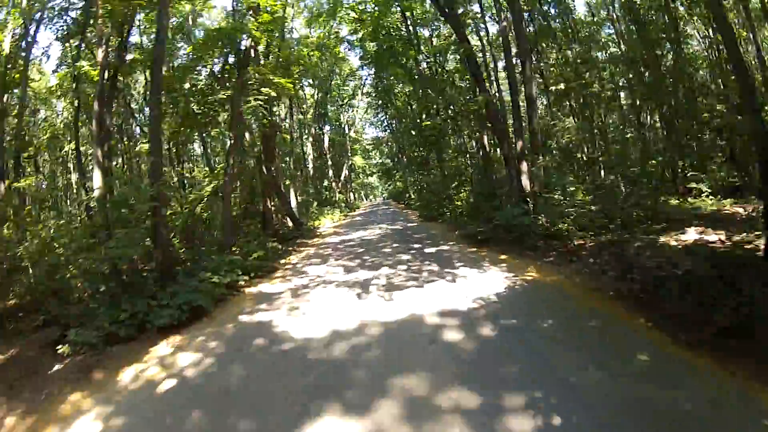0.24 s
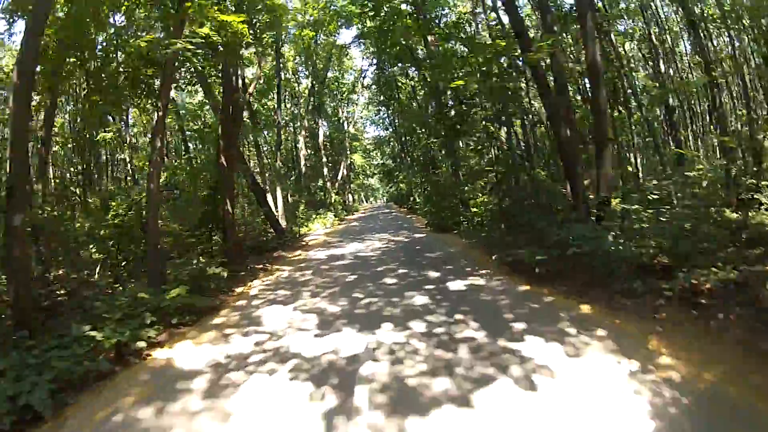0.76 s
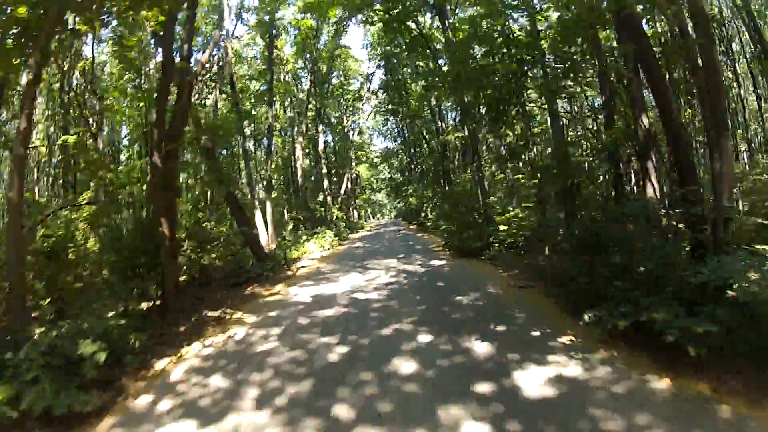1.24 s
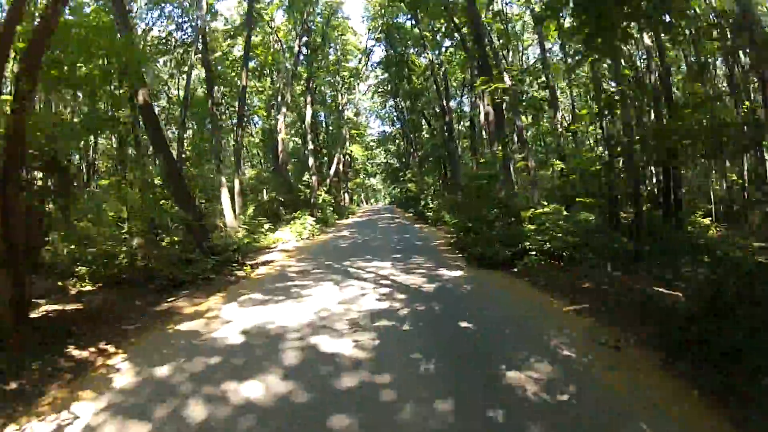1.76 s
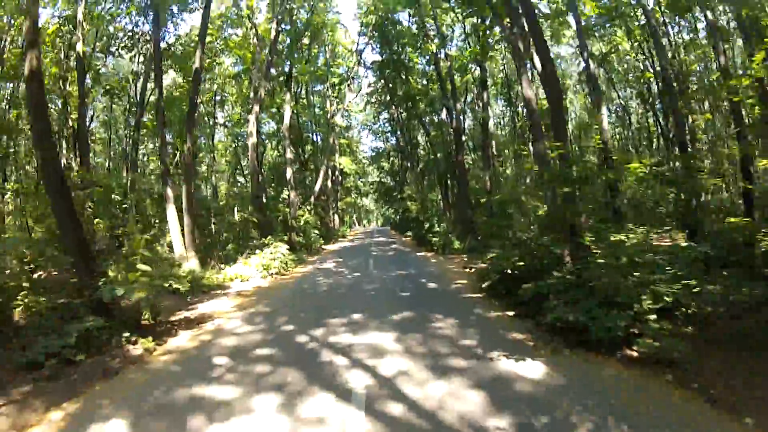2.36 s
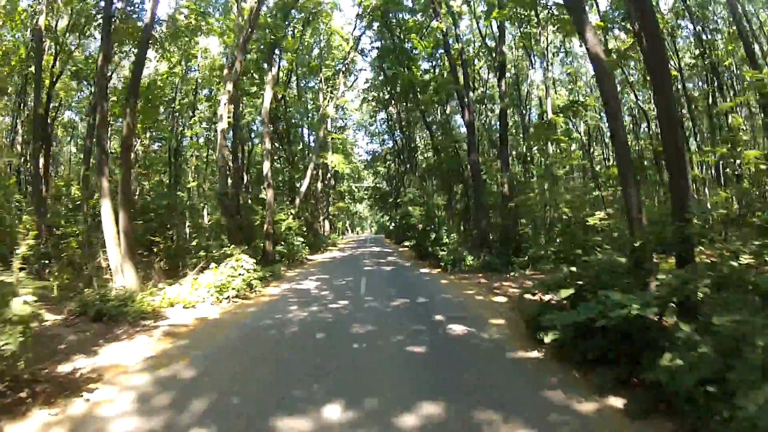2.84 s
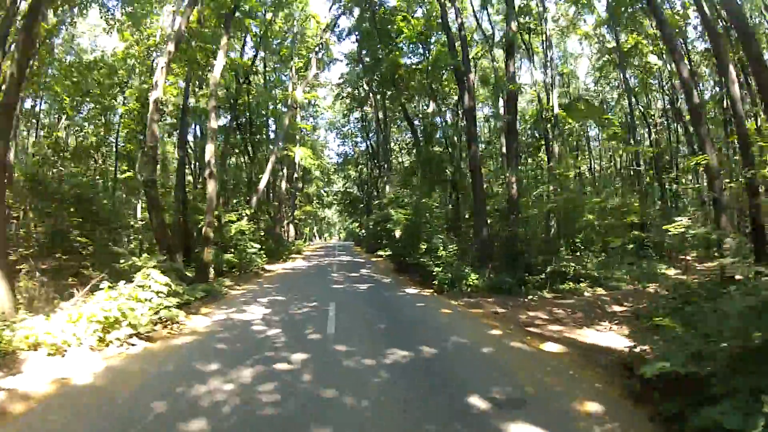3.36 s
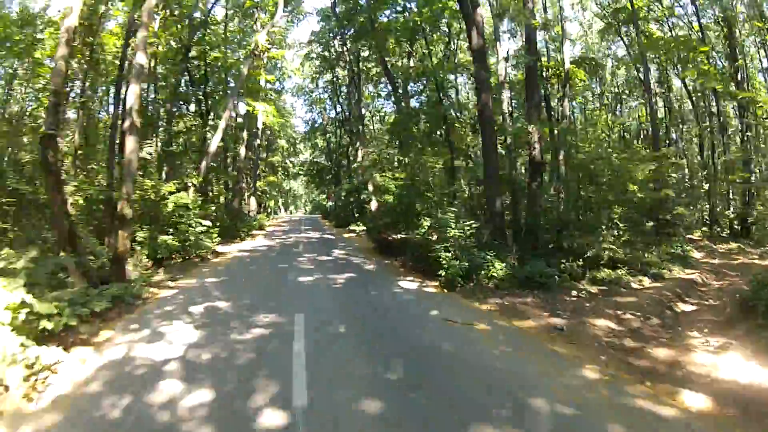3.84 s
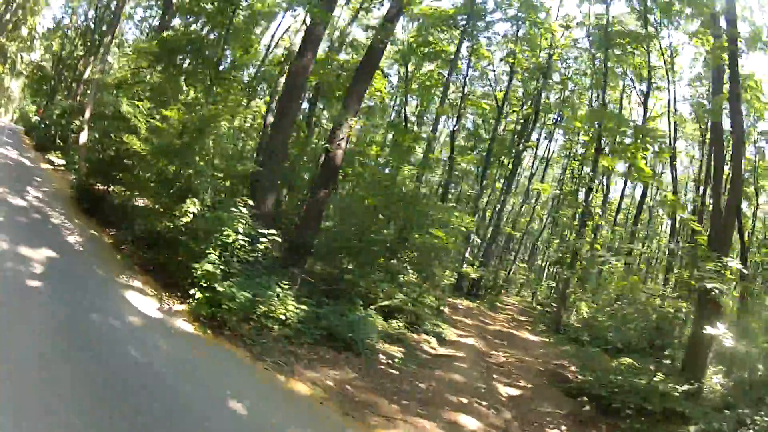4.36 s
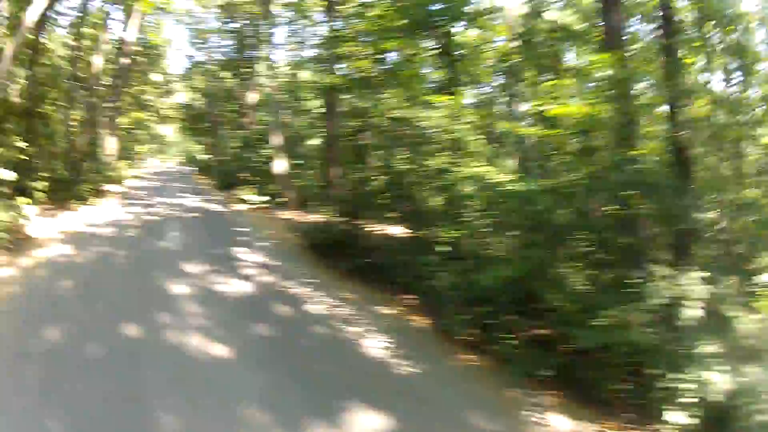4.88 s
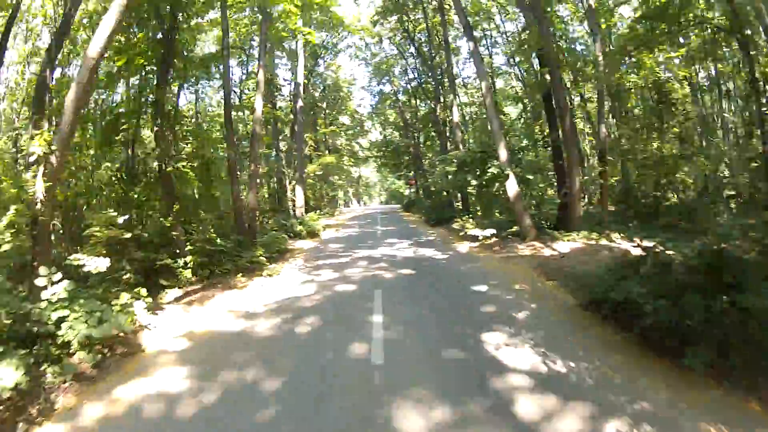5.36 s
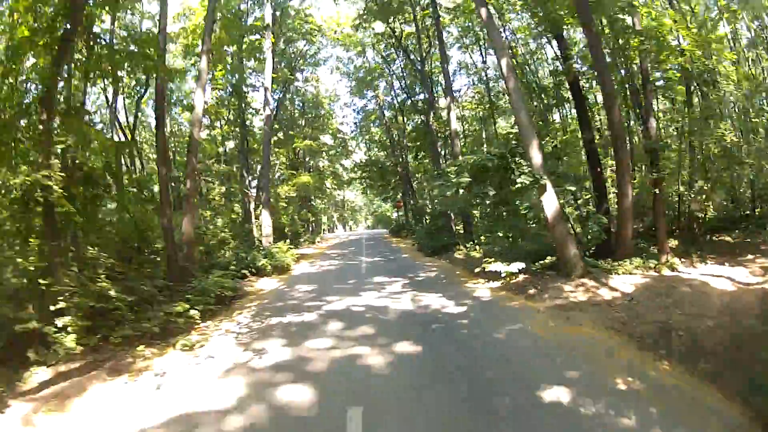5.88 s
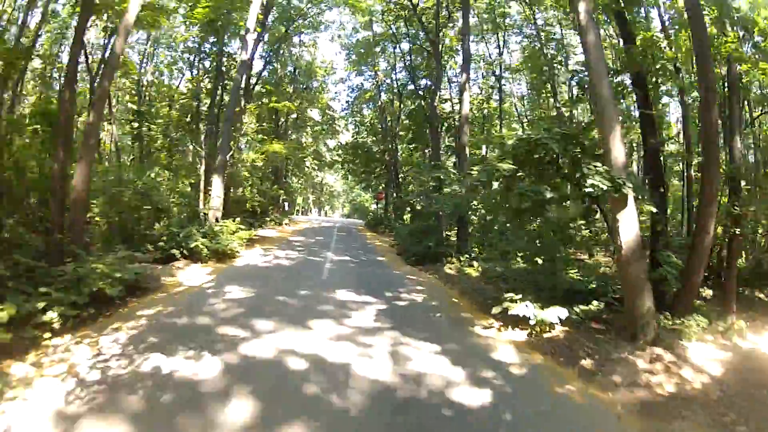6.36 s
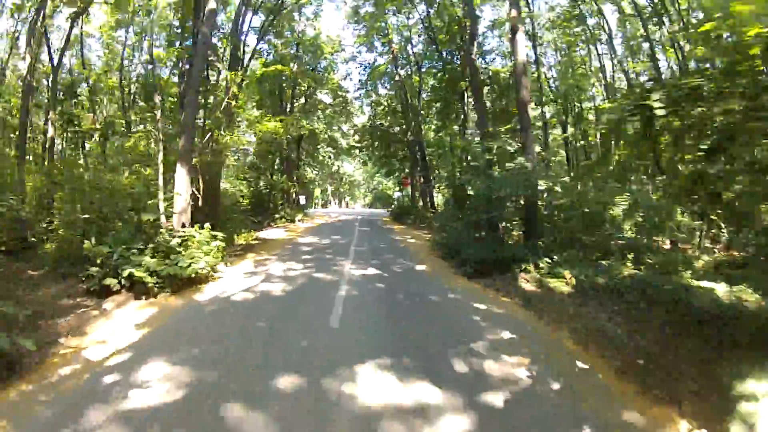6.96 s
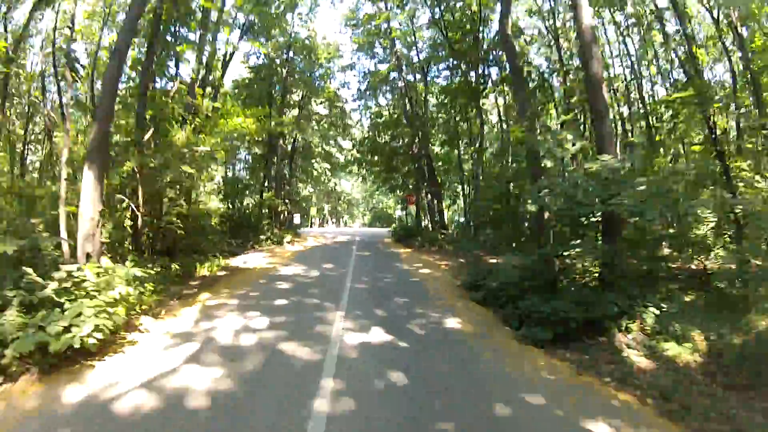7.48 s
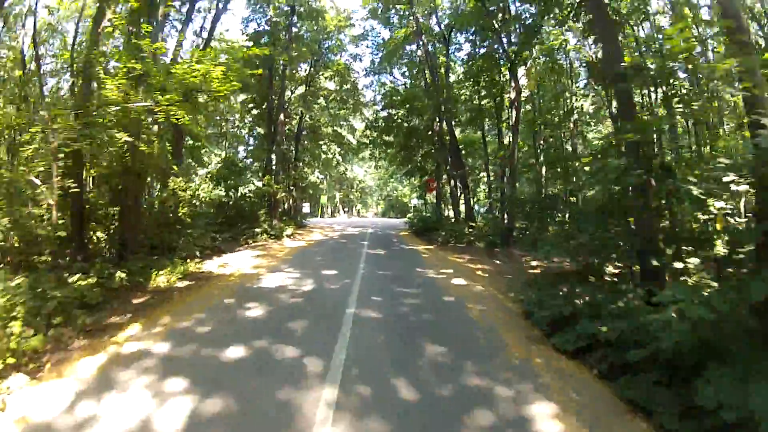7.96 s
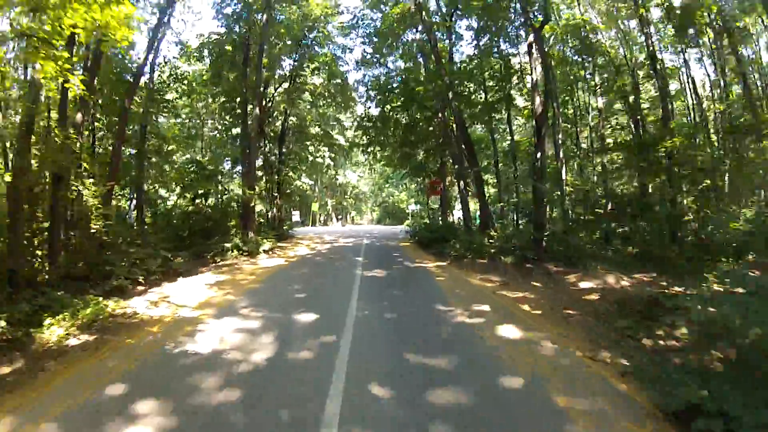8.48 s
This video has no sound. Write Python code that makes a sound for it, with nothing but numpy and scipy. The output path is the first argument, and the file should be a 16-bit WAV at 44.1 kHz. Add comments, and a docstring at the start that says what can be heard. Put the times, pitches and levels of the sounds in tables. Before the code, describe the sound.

A gusty headwind rushes and rumbles on a helmet microphone as a bicycle rolls along a paved forest road, its tyres humming softly below. Faint birds chirp in the trees. About four seconds in, the rush drops away for a second, then returns. A few sharp, dry ticks follow, and the birds chirp again near the end.

```python
"""Headwind on a small helmet camera's microphone, riding a bicycle along a paved forest road.
Right at the capsule the wind buffets the membrane and rushes in the resonances of port and housing,
fading while the head is turned. Tyres hum on the road below, birds chirp off in the trees, and a few
dry ticks sound. The recorder holds each 12 kHz sample, so the sound is mirrored in the treble."""
import sys
import numpy as np
from scipy import signal
from scipy.fft import rfft, irfft
from scipy.io import wavfile

SR = 44100
rng = np.random.default_rng(int(sys.argv[2]) if len(sys.argv) > 2 else 0)


def transcribe(u):
    """Save the signal u as a 16-bit wav file named by the first command-line argument.

    u: samples, shape (n,) or (channels, n), limited to [-1, 1]; the rate is SR.
    q: integer samples, one column per channel.
    """
    v = np.clip(np.atleast_2d(u).T, -1, 1)
    q = np.round(v * 32767).astype(np.int16)
    wavfile.write(sys.argv[1], SR, q)


N = 384552

# Single bird notes. Each row: start and length in seconds, first and last pitch in Hz, level in dB.
BIRD_CHIRPS = [(1.248, .025, 4250, 4030, -61), (2.256, 0.069, 2800, 3350, -51),
               (2.314, 0.036, 3580, 4000, -50.5), (2.355, 0.04, 3690, 3830, -59),
               (2.447, 0.02, 3810, 4020, -48.5), (2.77, 0.04, 4100, 4280, -62),
               (2.885, 0.056, 3520, 3420, -57.5), (3.09, 0.042, 4700, 4250, -70),
               (3.125, .03, 4150, 4150, -66), (3.245, 0.055, 3270, 3220, -64),
               (3.345, .025, 4150, 3980, -67), (3.65, 0.062, 4520, 4360, -71),
               (7.67, .025, 4300, 4300, -66), (7.685, 0.034, 1860, 2110, -49),
               (7.72, 0.064, 2120, 2150, -43), (7.796, 0.055, 4290, 4240, -66),
               (7.965, 0.028, 3850, 4120, -64), (7.99, .035, 3800, 3600, -58),
               (7.996, 0.021, 4140, 4230, -60), (8.05, .035, 3800, 3550, -65),
               (8.292, 0.051, 3600, 3680, -59.5), (8.35, .045, 3600, 2930, -63),
               (8.548, 0.037, 3950, 3000, -60)]
# Buzzy bird trills. Each row: start and length in seconds, centre pitch in Hz, level in dB.
BIRD_TRILLS = [(3.377, 0.1, 3900, -65), (5.53, 0.16, 3960, -63.5), (7.245, 0.24, 3950, -60.5)]
# One bird repeats a falling whistle. Each row: start in seconds, level in dB.
FALLING_CALLS = [(.242, -65), (.374, -65), (.515, -67), (.645, -62), (.77, -66)]
# Its note. Each row: delay and length in seconds, first and last pitch in Hz, relative level in dB.
FALLING_NOTES = [(0.0011, 0.023, 5950, 5050, 2)]
# Another repeats a phrase of up, down and a low end. Each row: start in seconds, level in dB.
UP_DOWN_CALLS = [(.89, -56), (1.077, -54), (1.266, -55), (1.453, -54.5), (1.642, -52.5)]
# Its notes. Each row: delay and length in seconds, first and last pitch in Hz, relative level in dB.
UP_DOWN_NOTES = [(0, 0.0206, 3600, 4090, -0.5), (0.031, 0.043, 4400, 3090, -1.5),
                 (0.072, .022, 3240, 2950, 4)]
# Dry ticks. Each row: start in seconds, level in dB, pitch in Hz, seconds to fall by 60 dB.
DRY_TICKS = [(4.866, -44, 4800, 0.014), (4.867, -48, 5600, 0.011), (5.021, -32, 2440, 0.01),
             (5.979, -29, 2480, 0.016), (6.681, -31, 2390, 0.013), (7.449, -52, 3400, .006)]
# Slow layers of the ride. Each row: time in seconds, then tyre hum, housing airflow and thin hiss in dB.
RIDE_LEVELS = [(0.0, -54.5, -47, -61), (1.0, -53, -47, -58), (3.6, -53.5, -48, -64.5),
               (4.1, -56.5, -51, -66.5), (4.4, -56, -55.5, -70.5), (4.9, -56.5, -52.5, -70),
               (5.4, -54.5, -49.5, -63), (6.7, -54, -50, -67.5), (7.3, -53.5, -49, -65.5),
               (8.0, -55, -50.5, -64), (8.72, -54.5, -50, -65.5)]
# Resonances of the tyre hum. Each row: centre and width in Hz, relative level in dB.
TYRE_RESONANCES = [(115, 97, -2.5), (187.2, 55.6, 1), (221, 62, -1), (311, 168, -6), (437, 196, -11),
                   (593, 254, -12.5)]
# Brief hisses and whistles. Each row: start and length in seconds, centre and width in Hz, level in dB.
BRIEF_WHISTLES = [(.55, 0.58, 5030, 300, -69), (2.41, 0.083, 4940, 1190, -65),
                  (7.13, 0.28, 1400, 60.2, -56), (7.997, 0.28, 1393, 60, -55)]
# Resonances of the wind's thin hiss. Each row: centre and width in Hz, relative level in dB.
HISS_RESONANCES = [(3370, 480, 0.5), (3746, 290, 2), (3940, 540, 0), (4580, 290, -6), (4970, 520, -2.5),
                   (5400, 790, -12.5), (5720, 290, -8)]
# The housing with the wind head-on. Each row: resonance and width in Hz, relative level in dB.
HEAD_ON_RESONANCES = [(749, 140, -6.5), (890, 188, -6), (999, 102, -7.5), (1188, 112, -4),
                      (1268, 126, -1.5), (1374, 120, 0), (1578, 296, -5.5), (1864, 240, -6.5),
                      (2380, 290, -25)]
# The housing with the wind side-on. Each row: resonance and width in Hz, relative level in dB.
SIDE_ON_RESONANCES = [(792, 110, -6.5), (925, 133, -5), (1140, 170, -3), (1308, 270, -5), (1750, 166, -1),
                      (1966, 240, -6), (2230, 300, -5), (2480, 670, -16)]
# The head turns aside and back. Each row: time in seconds, share of the turn from 0 to 1.
TURN_SHARES = [(3.85, 0.2), (4.25, 0.93), (4.9, 0.9), (5.15, 0.0)]
# Spectrum of the wind pressure on the membrane. Each row: frequency in Hz, relative density in dB.
BUFFET_SPECTRUM = [(4.7, -12), (8, 10), (16, 10), (27, -2.5), (38, -11), (48, -7), (60, -6), (72, -11),
                   (92, -20), (130, -28), (200, -56)]
# Strong buffets. Each row: time in seconds, slow heave in dB, quicker flutter in dB.
STRONG_BUFFETS = [(.23, -48, -59), (.52, -37, -52), (.68, -52, -51), (1.38, -36.5, -53),
                  (1.6, -41.5, -46.5), (1.7, -39, -44), (1.96, -39, -60), (2.2, -49, -45.5),
                  (2.551, -43, -60), (2.75, -35, -52), (2.88, -35.5, -42.5), (3.01, -56, -49),
                  (3.53, -47, -57), (3.63, -47, -43), (4.07, -53, -68), (5.01, -44, -56),
                  (5.29, -42.5, -53), (5.39, -43.5, -60), (5.68, -53, -67), (5.87, -45, -52),
                  (6.21, -47.5, -64), (6.36, -50, -55), (6.63, -48, -60), (7.06, -42, -54),
                  (7.16, -47, -50), (7.49, -39.5, -57), (7.65, -41, -51), (8.05, -45, -62),
                  (8.24, -41, -50.5), (8.38, -41, -52)]
# Sudden lulls in the rush. Each row: start in seconds, depth in dB, recovery in seconds.
RUSH_LULLS = [(0.259, 5, 0.078), (0.81, 7.5, 0.06), (1.34, 10, 0.047), (2.641, 13, 0.033),
              (5.371, 4.5, 0.068), (5.83, 9, 0.058), (6.05, 6, 0.073), (6.70, 2, 0.04), (7.14, 1, .04),
              (8.42, 7, 0.029)]
# Short puffs in the rush. Each row: time in seconds, rise in dB.
RUSH_PUFFS = [(.06, -1), (1.25, 5), (1.33, 5), (1.58, 4.5), (2.87, 3), (3.36, 3.5), (5.56, 2.5), (6.03, 3),
              (6.22, 2.5), (6.46, 4), (6.69, 7), (7.1, 6), (7.21, 2), (7.32, 4.5), (7.95, 3), (8.12, 3),
              (8.35, 3), (8.52, 5.5), (8.58, 3)]
# Resonances of the microphone port. Each row: centre and width in Hz, relative level in dB.
PORT_RESONANCES = [(2127, 161, 0), (2279, 140, -1), (2434, 156, 1.5), (2567, 236, 1), (2849, 186, -5.5),
                   (3090, 56, -43), (1883, 166, -7)]
# Headwind rushing in the port. Each row: time in seconds, level in dB.
RUSH_LEVELS = [(0.0, -44.5), (.2, -39), (.45, -37.5), (.75, -38.5), (1.1, -42), (1.5, -42), (1.78, -41.5),
               (1.92, -40), (2.45, -38.5), (2.88, -40.5), (3.2, -47.5), (3.7, -43), (3.93, -44.5),
               (4.02, -56), (4.24, -56), (4.4, -62), (4.98, -56), (5.03, -51), (5.3, -44.5), (5.7, -43),
               (5.95, -47), (6.3, -40.5), (6.5, -41.5), (6.65, -45.5), (6.95, -45), (7.0, -41.5),
               (7.45, -43), (7.7, -43.5), (8.1, -42), (8.72, -44)]


def amp(db):
    """Decibels to gain."""
    return 10 ** (np.asarray(db) / 20)


def rms_one(x):
    """Scale to unit rms."""
    return x / np.sqrt(np.mean(x ** 2) + 1e-20)


def in_time(rows):
    """Columns of a curve table, one value a sample."""
    times, *columns = np.transpose(rows)
    return [np.interp(np.arange(N) / SR, times, column) for column in columns]


def drift(rate_hz):
    """Random wavering with a spread of 1, mostly slower than rate_hz."""
    r = np.exp(-80 * np.pi * rate_hz / SR)
    slow = signal.lfilter([1], [1, -2 * r, r * r], rng.standard_normal(N // 40 + 2002))[2000:]
    return np.interp(np.arange(N) / 40, np.arange(len(slow)), rms_one(slow))


def resonance(x, hz, width_hz):
    """A peak of gain 1, applied twice for steep skirts."""
    r = np.exp(-np.pi * width_hz / SR)
    row = [(1 - r * r) / 2, 0, (r * r - 1) / 2, 1, -2 * r * np.cos(2 * np.pi * hz / SR), r * r]
    return signal.sosfilt([row, row], x)


def turbulence(modes, flutter_db, patchy_db):
    """Fluttering noise that rings in resonances, each wavering on its own; rms 1."""
    noise = rng.standard_normal((2, N)) * amp(flutter_db)
    return rms_one(sum(amp(db + patchy_db * drift(5.7)) * resonance(noise[k % 2], hz, width)
                       for k, (hz, width, db) in enumerate(modes)))


def swell(start, length):
    """Sample span of a note, its progress 0-1 and a rounded envelope."""
    first = round(start * SR)
    along = np.linspace(0, 1, round(length * SR))
    return slice(first, first + len(along)), along, np.sqrt(2 * np.sin(np.pi * along))


def bird_notes():
    """The single chirps and the notes of the repeated calls, in one list."""
    repeated = ((FALLING_CALLS, FALLING_NOTES), (UP_DOWN_CALLS, UP_DOWN_NOTES))
    return BIRD_CHIRPS + [(start + delay, length, first_hz, last_hz, db + note_db)
                          for calls, notes in repeated
                          for start, db in calls
                          for delay, length, first_hz, last_hz, note_db in notes]


def birds(pulses_per_s=75, swing_hz=199, forest_t60_s=.3):
    """Birds off in the trees: gliding near-sines and pulsed trills, blurred by forest echoes."""
    song, unsteady = np.zeros(N), drift(36.3)
    wobble_hz = 70 * drift(150)
    for start, length, first_hz, last_hz, db in bird_notes():
        span, along, shape = swell(start, length)
        pitch = first_hz + (last_hz - first_hz) * along + wobble_hz[span]
        song[span] += amp(db) * shape * np.sin(2 * np.pi * np.cumsum(pitch) / SR)
    for start, length, hz, db in BIRD_TRILLS:
        span, _, shape = swell(start, length)
        beat = np.cumsum(pulses_per_s * (1 + 0.292 * unsteady[span]) / SR) % 1
        slide = 1 - 2 * beat + 0.413 * unsteady[span]   # each pulse falls through the centre pitch
        tone = np.sin(2 * np.pi * np.cumsum(hz + swing_hz * slide + wobble_hz[span]) / SR)
        song[span] += amp(db) * shape * np.sqrt(np.sin(np.pi * beat)) * tone
    t = np.arange(SR // 4) / SR
    echoes = rng.standard_normal(len(t)) * amp(-60 * t / forest_t60_s)
    song *= amp(3.93 * drift(230))   # leaves and moving air make the notes rasp
    return song + amp(-5) * signal.fftconvolve(song, echoes / np.sqrt(np.sum(echoes ** 2)))[:N]


def ticks():
    """Dry ticks, each a click in one damped mode."""
    out = np.zeros(N)
    for start, db, hz, t60 in DRY_TICKS:
        t = np.arange(round(t60 * SR)) / SR
        envelope = amp(db - 60 * t / t60) * (1 - np.exp(-t / 0.00037))
        out[round(start * SR):][:len(t)] += envelope * np.sin(2 * np.pi * hz * t)
    return out


def tyre_hum(level_db):
    """Tyres rolling on the paving, a rider's height below the microphone: noise in low resonances."""
    return amp(level_db) * turbulence(TYRE_RESONANCES, 0.54 * drift(4.2), patchy_db=.6)


def whistles():
    """Brief swells of narrow noise, probably airflow in the housing."""
    out, white = np.zeros(N), rng.standard_normal(N)
    for start, length, hz, width_hz, db in BRIEF_WHISTLES:
        span, _, shape = swell(start, length)
        out[span] += amp(db) * shape * rms_one(resonance(white, hz, width_hz))[span]
    return out


def thin_hiss(level_db, eddies):
    """The thin top of the rush: eddies ringing in treble resonances."""
    return amp(level_db) * turbulence(HISS_RESONANCES, 0.51 * eddies + 0.35 * drift(31), patchy_db=1.8)


def housing_airflow(level_db, eddies):
    """Air flowing round the housing rings in other resonances as the head turns aside."""
    turn = in_time(TURN_SHARES)[0]
    head_on = turbulence(HEAD_ON_RESONANCES, 0.84 * eddies, patchy_db=0.83)
    side_on = turbulence(SIDE_ON_RESONANCES, 0.25 * eddies, patchy_db=2.0)
    return amp(level_db) * (np.sqrt(1 - turn) * head_on + np.sqrt(turn) * side_on)


def buffeting(airflow_db, calm_heave_db=-51.5, calm_flutter_db=-55, split_hz=40, half_width_s=.025):
    """Wind pressure on the membrane: a slow heave and a quicker flutter, swelling at each buffet."""
    t, hz = np.arange(N) / SR, np.fft.rfftfreq(N, 1 / SR)
    knots_hz, knots_db = np.transpose(BUFFET_SPECTRUM)
    shape = amp(np.interp(np.log(hz + 1e-3), np.log(knots_hz), knots_db, left=-99, right=-99))
    pressure = rfft(rng.standard_normal(N)) * shape
    slow_share = 1 / np.sqrt(1 + (hz / split_hz) ** 8)
    heave = rms_one(irfft(pressure * slow_share, N))
    flutter = rms_one(irfft(pressure * np.sqrt(1 - slow_share ** 2), N))
    swing_db = 0.33 * (airflow_db - airflow_db.mean())   # the calm level partly follows the airflow
    heave_gain = amp(calm_heave_db + swing_db + 2.2 * drift(7))
    flutter_gain = amp(calm_flutter_db + swing_db + 2.5 * drift(11))
    for time, heave_db, flutter_db in STRONG_BUFFETS:
        bump = np.exp(-((t - time) / half_width_s) ** 2 / 2)
        heave_gain += amp(heave_db) * bump
        flutter_gain += amp(flutter_db) * bump
    return amp(1.95 * drift(17)) * heave_gain * heave + amp(1.2 * drift(22)) * flutter_gain * flutter


def lulls_and_puffs(drop_s=0.0027, puff_half_width_s=0.014):
    """Gain of the rush: each lull drops within milliseconds and recovers, each puff swells and sinks."""
    t, gain_db = np.arange(N) / SR, np.zeros(N)
    for start, depth_db, recovery in RUSH_LULLS:
        after = np.maximum(t - start, 0)
        gain_db -= depth_db * (1 - np.exp(-after / drop_s)) * np.exp(-(after / recovery) ** 2)
    for time, rise_db in RUSH_PUFFS:
        gain_db += rise_db * np.exp(-((t - time) / puff_half_width_s) ** 2 / 2)
    return amp(gain_db)


def port_rush(eddies, gusts_db=0.89):
    """Gusty headwind right at the microphone, ringing in the resonances of its port."""
    level_db = in_time(RUSH_LEVELS)[0] + gusts_db * drift(30)
    return amp(level_db) * turbulence(PORT_RESONANCES, 1.07 * eddies, patchy_db=.5)


def scene():
    """The ride in mono from the helmet: wind on the microphone, tyres below, birds further off."""
    tyre_db, airflow_db, hiss_db = in_time(RIDE_LEVELS)
    gusting = lulls_and_puffs()
    eddies = drift(82)   # the same eddies shake rush, hiss and airflow
    wind = gusting * port_rush(eddies)
    wind += gusting ** 0.18 * thin_hiss(hiss_db, eddies)   # the hiss follows only faintly
    wind += housing_airflow(airflow_db, eddies)
    return (wind + tyre_hum(tyre_db) + buffeting(airflow_db) + birds() + whistles() + ticks())[None]


def record(dry, hold_hz=12000, cutoff_hz=15270):
    """The camera samples at 12 kHz, holds each sample for four steps of 48 kHz and cuts the top."""
    hz = np.fft.rfftfreq(N, 1 / SR)
    base = irfft(rfft(dry) * (hz < hold_hz / 2) * amp(-5 * np.exp((hz - hold_hz / 2) / 120)), N)
    mirrored = base * (1 + 2 * np.cos(2 * np.pi * hold_hz * np.arange(N) / SR))   # images round hold_hz
    droop = np.sinc(hz / hold_hz) / np.sinc(hz / (4 * hold_hz))
    held = irfft(rfft(mirrored) * droop, N)
    return signal.sosfilt(signal.ellip(16, .5, 60, cutoff_hz, fs=SR, output="sos"), held)


dry = scene()
out = record(dry)
transcribe(out)
```